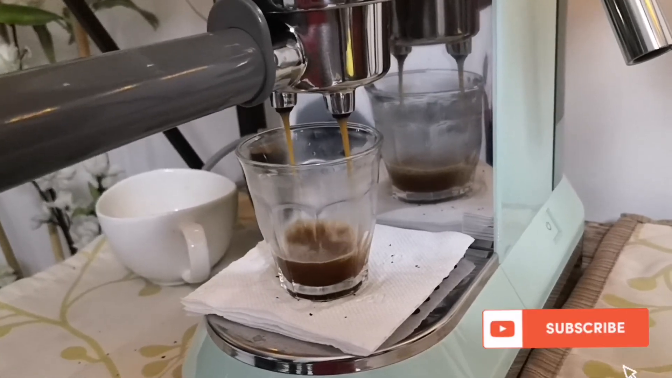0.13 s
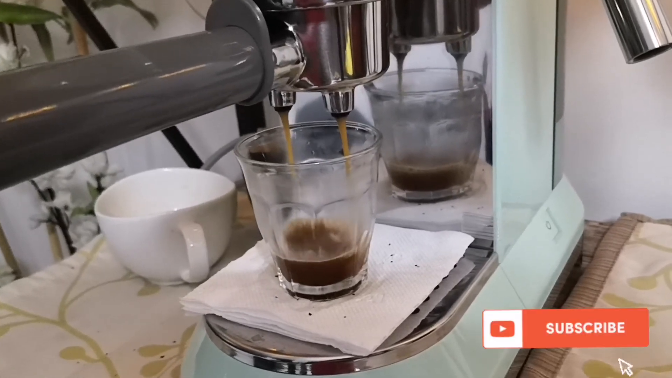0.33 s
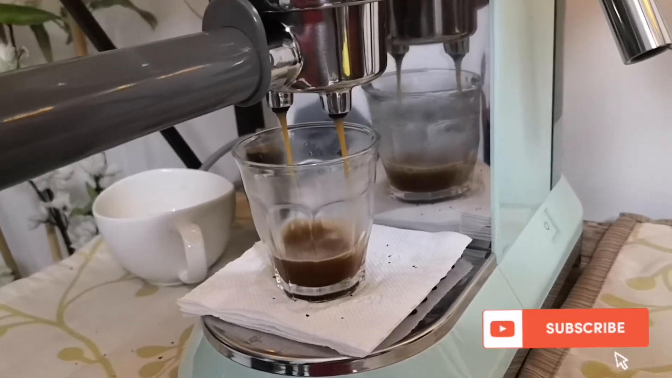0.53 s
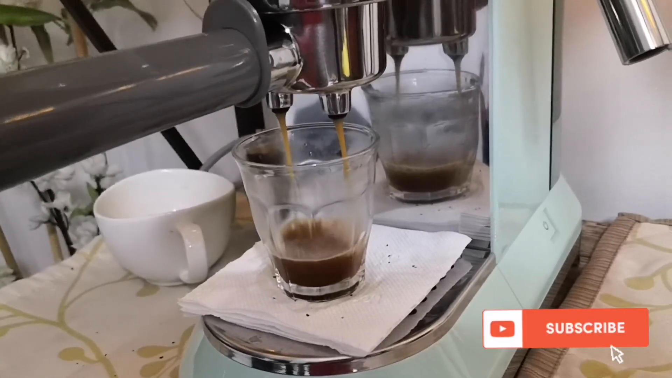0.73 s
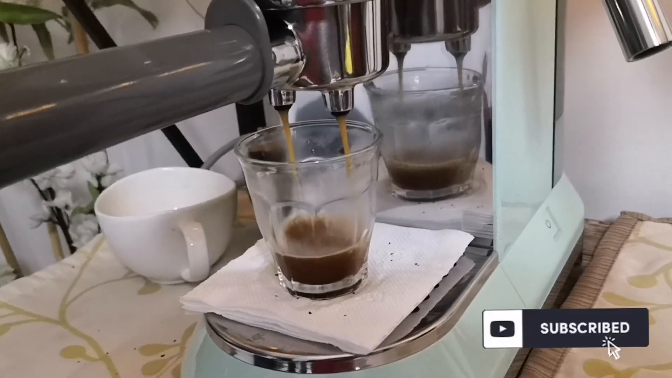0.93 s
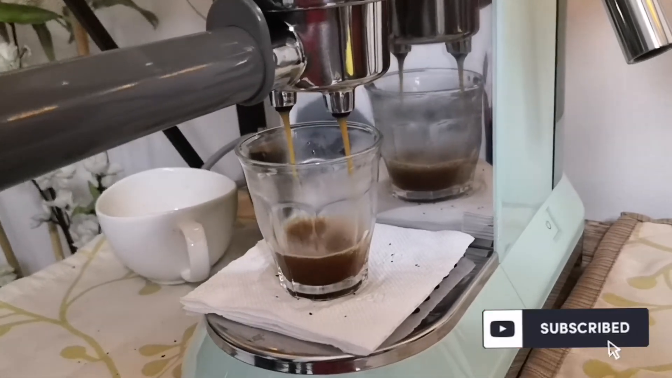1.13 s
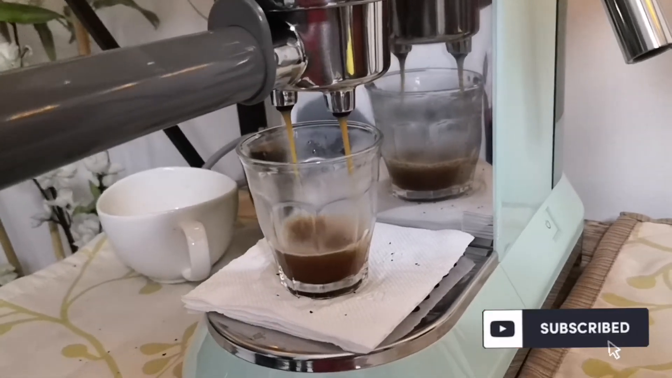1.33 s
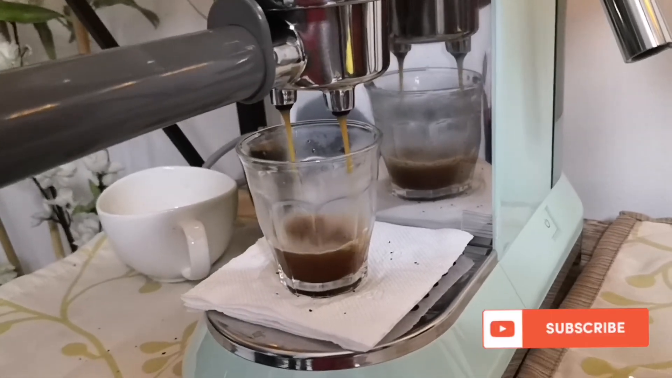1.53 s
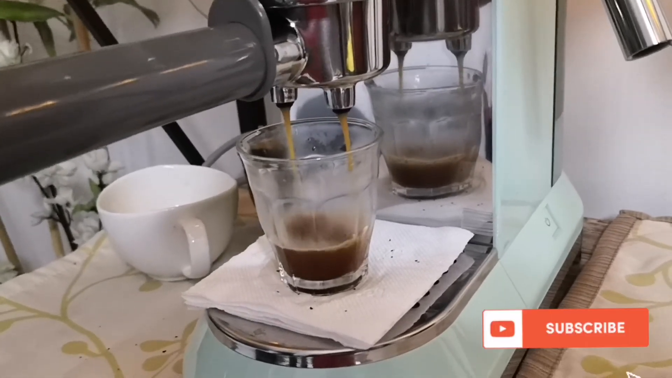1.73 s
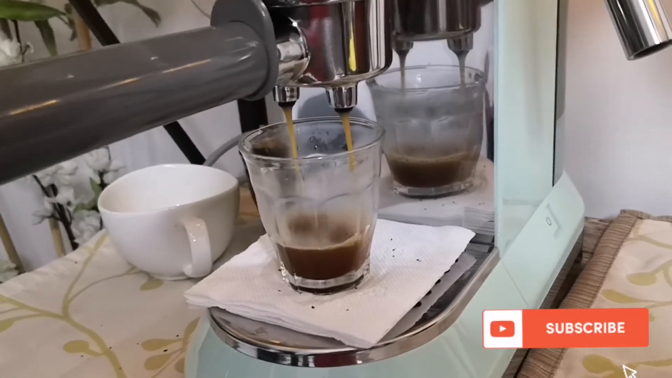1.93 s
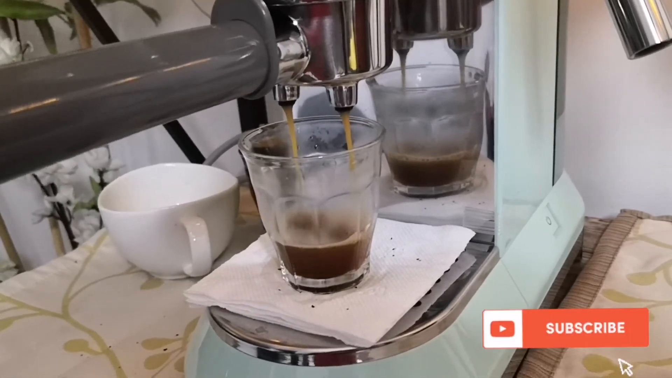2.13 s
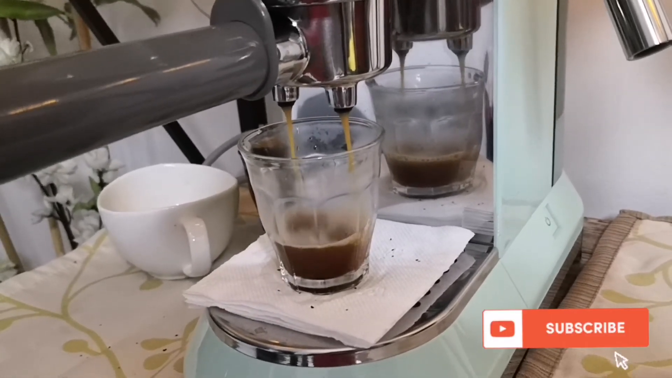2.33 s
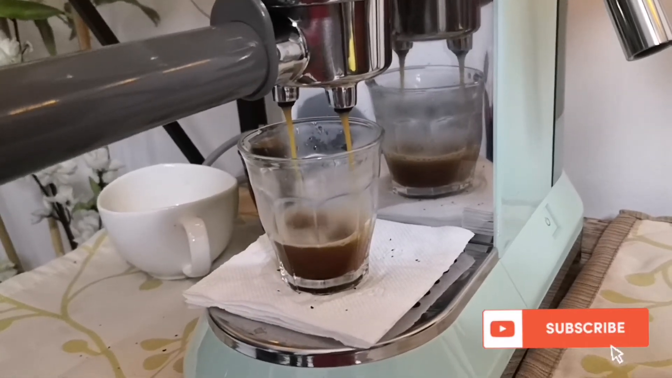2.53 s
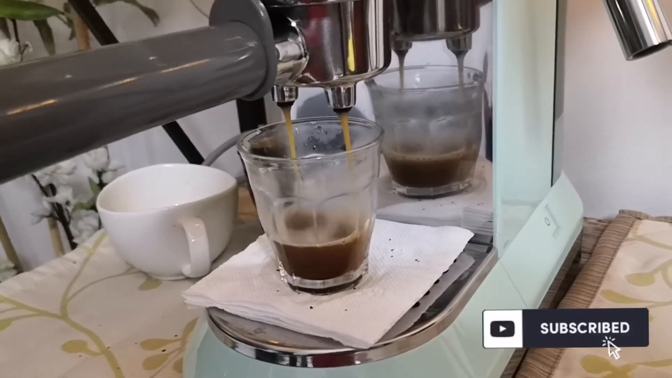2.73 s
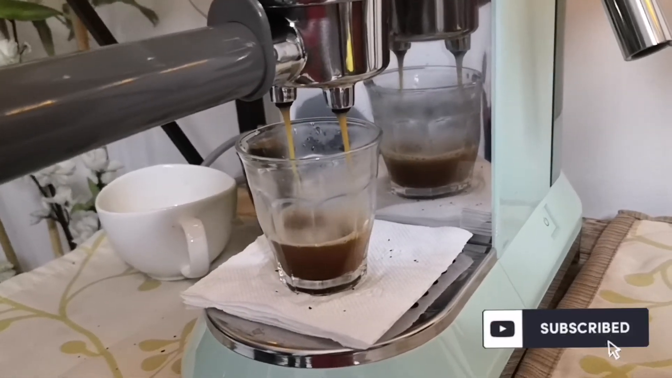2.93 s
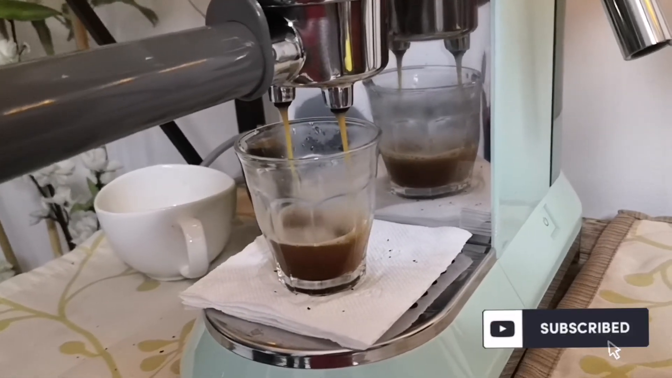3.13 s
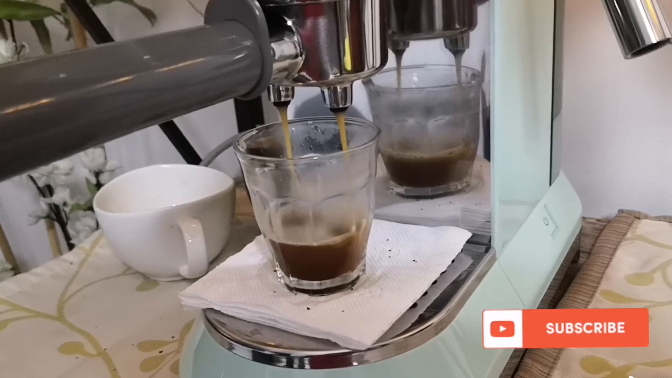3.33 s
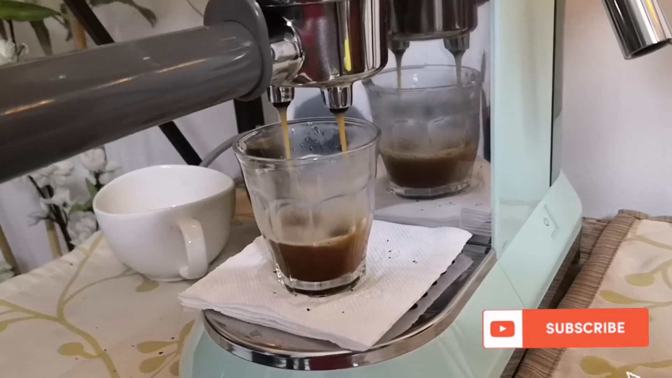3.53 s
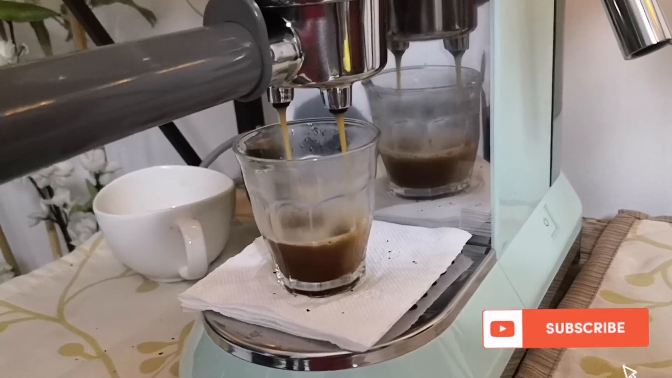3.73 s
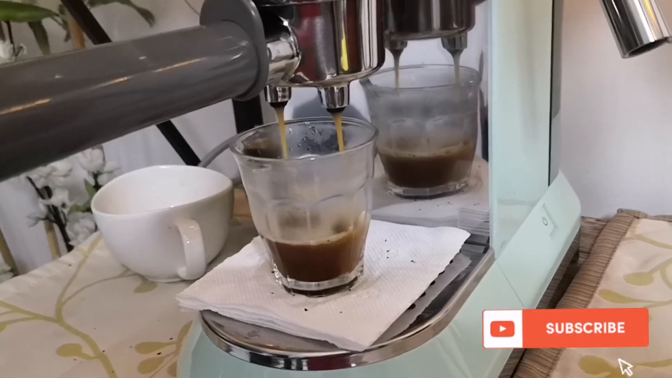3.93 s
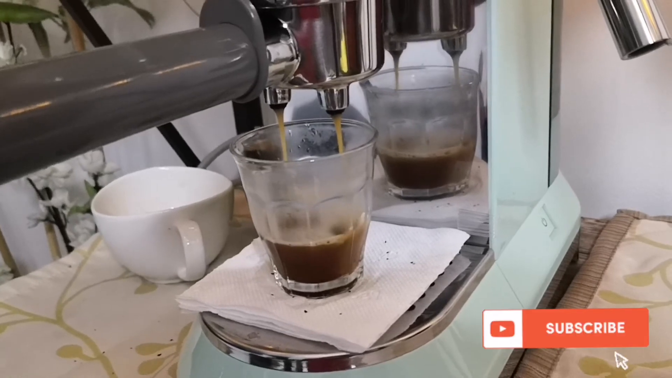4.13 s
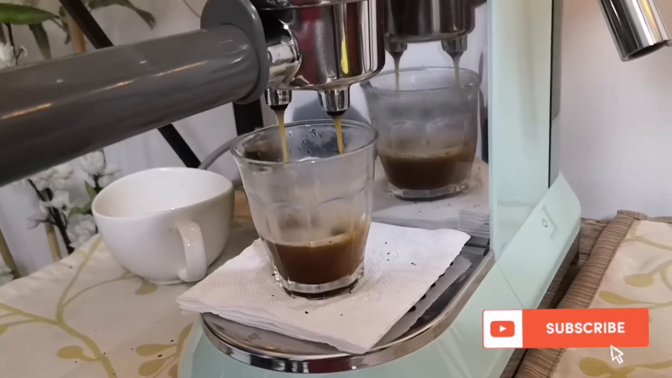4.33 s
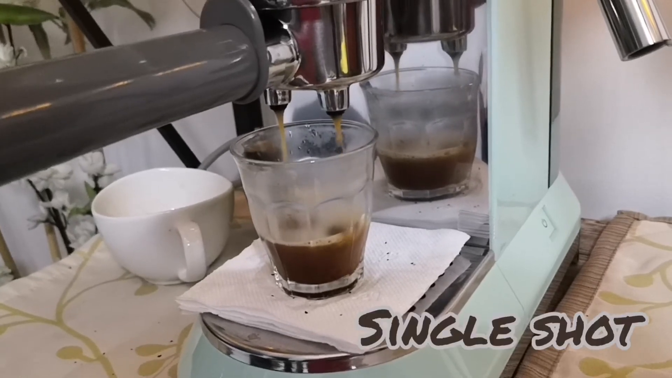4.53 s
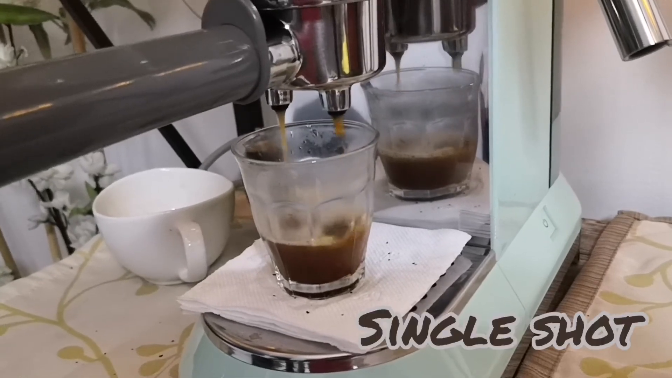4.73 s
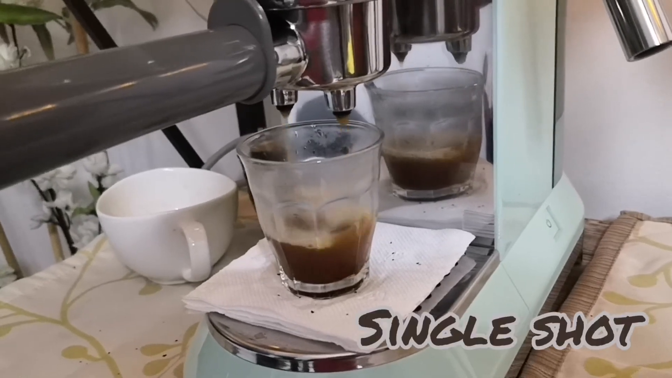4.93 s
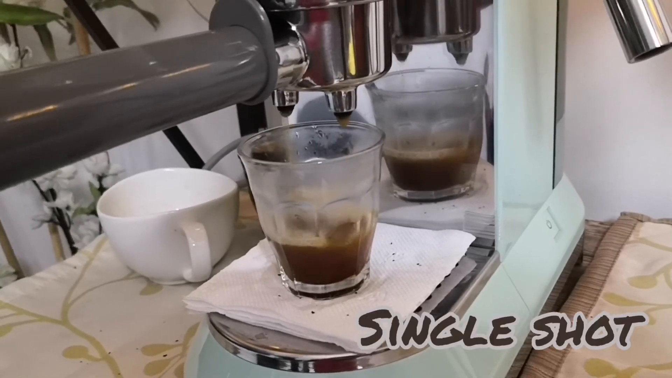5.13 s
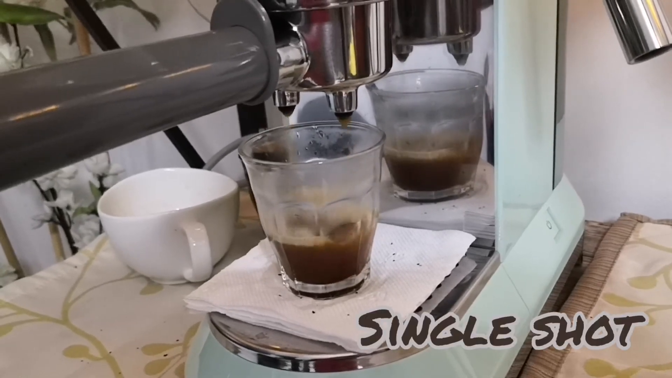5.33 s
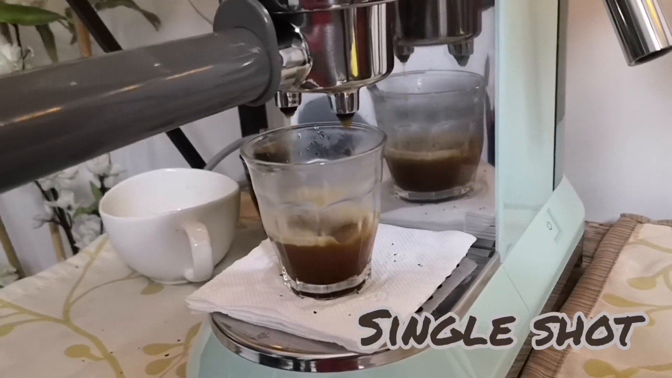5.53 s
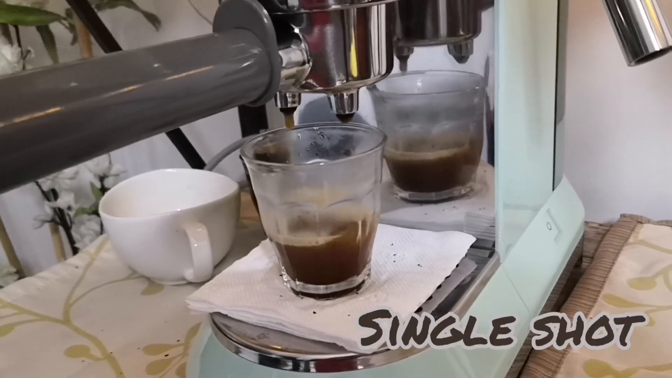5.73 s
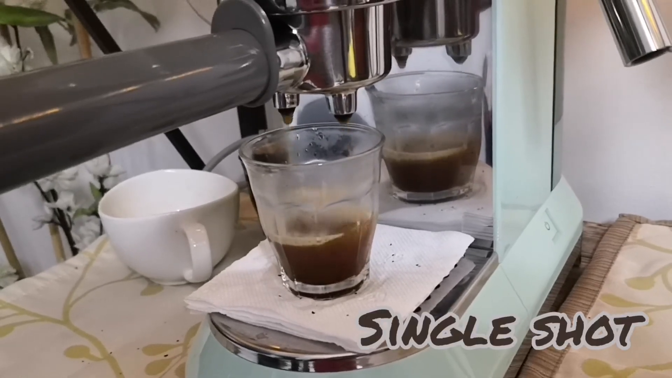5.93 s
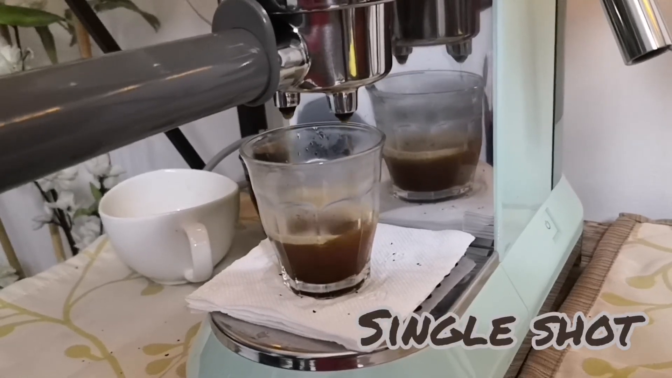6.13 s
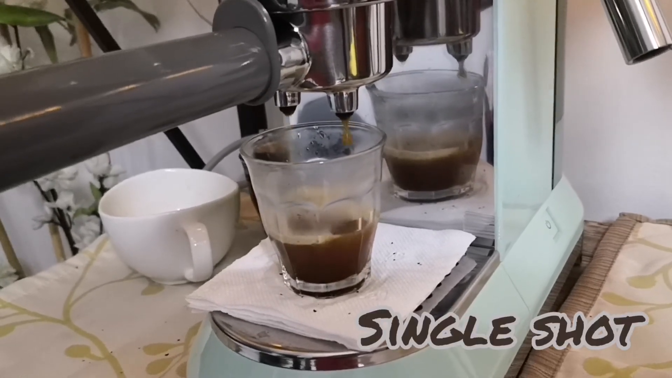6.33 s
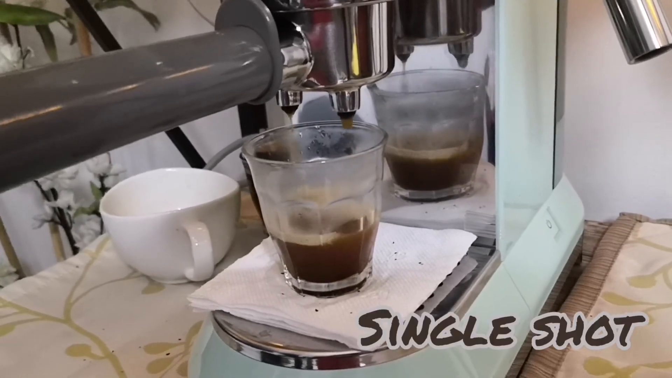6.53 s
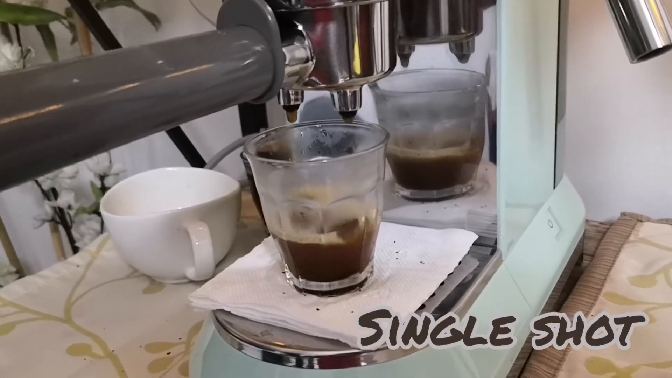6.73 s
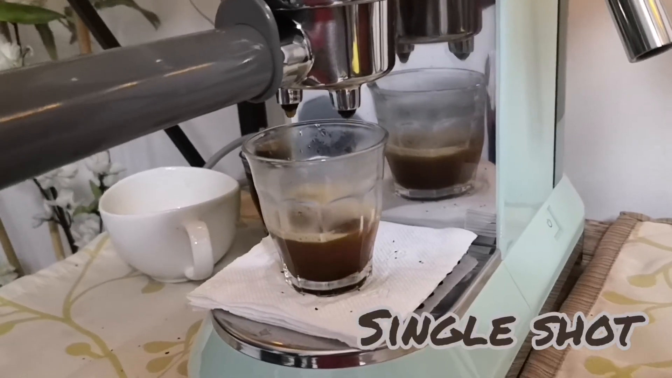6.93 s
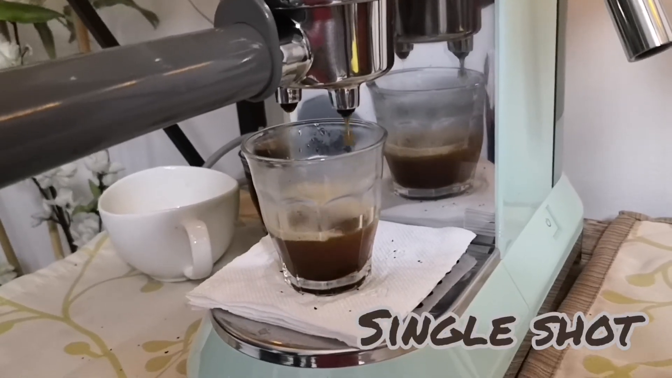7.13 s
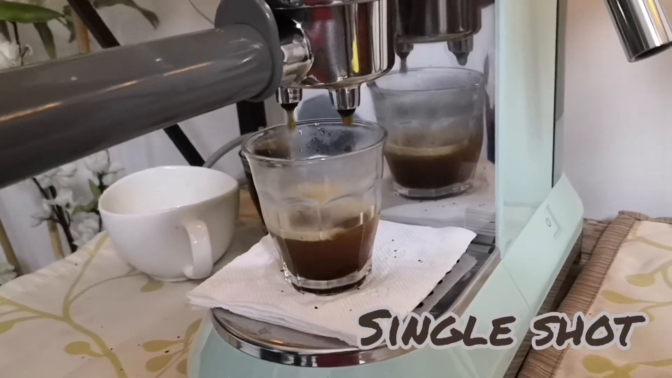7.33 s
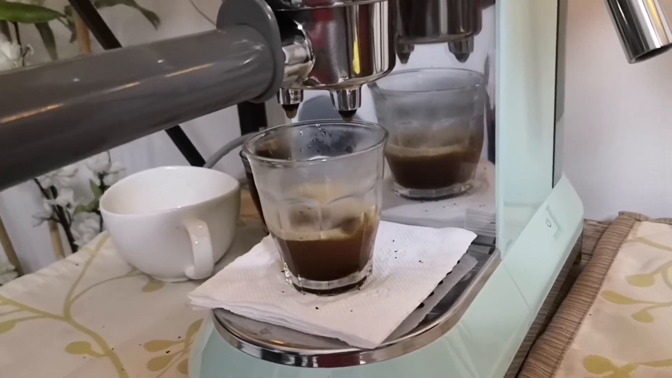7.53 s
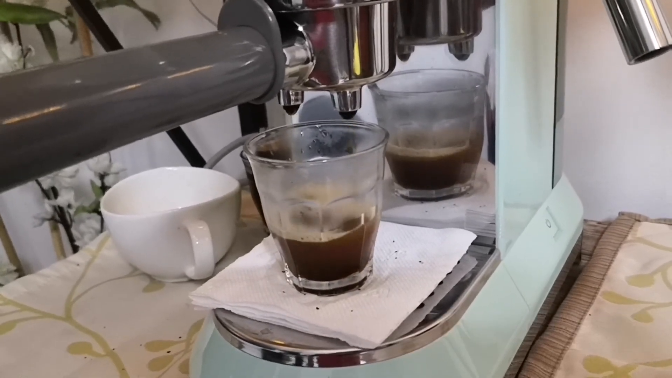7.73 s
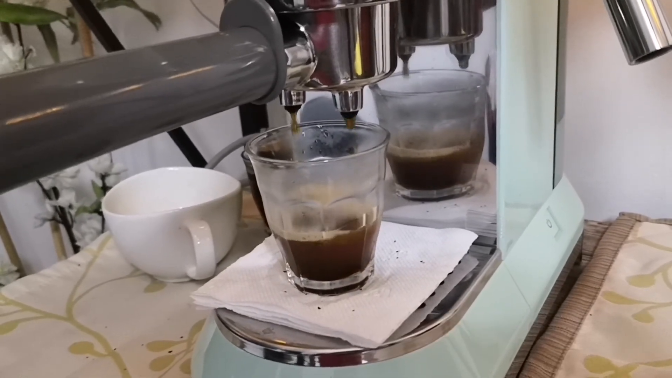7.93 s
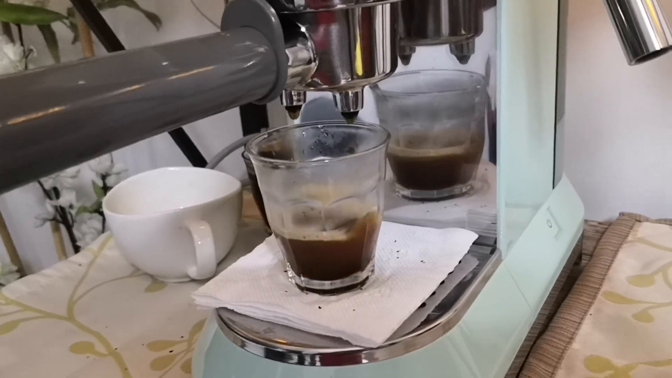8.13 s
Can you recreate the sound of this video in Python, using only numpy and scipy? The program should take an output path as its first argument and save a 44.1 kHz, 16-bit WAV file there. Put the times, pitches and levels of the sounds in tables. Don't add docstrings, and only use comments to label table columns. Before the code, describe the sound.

Close to a small espresso machine in a quiet kitchen, a vibrating pump hums low and buzzy with rushing water for about three seconds. Drops plink in a small glass and foam bubbles tick brightly. The pump cuts off abruptly; a very faint hiss bleeds away as drips grow sparse and end. Nearby cloth swishes and stiff wrapping crackles. Soft appliance hiss and distant traffic remain, in spaced stereo with a bright top.

```python
import sys
import numpy as np
from scipy import signal
from scipy.fft import rfft, irfft, next_fast_len
from scipy.io import wavfile
from scipy.ndimage import uniform_filter1d, map_coordinates

SR = 44100
rng = np.random.default_rng(int(sys.argv[2]) if len(sys.argv) > 2 else 0)


def transcribe(signal):
    frames = np.atleast_2d(signal).T
    limited = np.clip(frames, -1, 1)
    pcm = np.round(limited * 32767).astype(np.int16)
    wavfile.write(sys.argv[1], SR, pcm)


def nominal_scale(level):
    x = np.asarray(level, float) / 20
    return 10 ** x


N = 365148
CUT_S = 3.143


def unit(x):
    return x / np.sqrt(np.mean(x ** 2) + 1e-20)


def along(points, hz):
    f, v = np.transpose(points)
    return np.interp(np.log(hz + 1), np.log(f + 1), v)


def wobble(rate):
    return map_coordinates(rng.standard_normal(int(N * rate / SR) + 4), [np.arange(N) * rate / SR])


def filtered(x, response):
    n = x.shape[-1]
    m = next_fast_len(n + 4096)
    return irfft(rfft(x, m) * response(np.fft.rfftfreq(m, 1 / SR)), m)[..., :n]


def resonance(hz, width_hz):
    return lambda f: 1j * f * width_hz / (hz * hz - f * f + 1j * f * width_hz)


def stroke(s, attack, hold, t60):
    t = np.maximum(np.arange(N) / SR - s, 0)
    return (1 - np.exp(-(t / attack) ** 2)) * nominal_scale(-60 * np.maximum(t - hold, 0) / t60)


def add(track, s, sound):
    part = track[:, round(s * SR):][:, :sound.shape[-1]]
    part += sound[..., :part.shape[-1]]


# hz, correlation
ALIKE = [(60, .995), (130, .95), (290, .78), (450, .25), (640, -.25), (1400, .03), (3100, -.08),
         (6800, .02)]


def rush(gain, patchy_db):
    z = signal.stft(rng.standard_normal((2, N)), nperseg=512)[2]
    field = uniform_filter1d(uniform_filter1d(rng.standard_normal(z.shape[1:]), 6, 0), 10, 1)
    pair = signal.istft(z * nominal_scale(patchy_db * unit(field)), nperseg=512)[1][:, :N]

    def mid_side(hz):
        angle = np.arccos(np.clip(along(ALIKE, hz), -1, 1)) / 2
        return gain(hz) * [np.cos(angle), np.sin(angle)]

    mid, side = filtered(pair, mid_side)
    return unit(np.array([mid + side, mid - side]))


# hz, gain_db
PORT = [(6500, -1), (7600, 3.5), (8500, -2.5), (11000, -7.5), (12200, -27), (16000, -20)]


def port(hz):
    return nominal_scale(along(PORT, hz))


# hz, t60_s
WALLS = [(500, 0.21), (2000, 0.18), (8000, 0.096)]


def walls(x, wet_db):
    hz, t, z = signal.stft(rng.standard_normal((2, SR // 2)), SR, nperseg=256)
    tail = signal.istft(z * nominal_scale(-60 * t / along(WALLS, hz)[:, None]), SR, nperseg=256)[1]
    late = np.pad(x, ((0, 0), (150, 0)))
    wet = signal.fftconvolve(late, tail / np.linalg.norm(tail[0]), axes=1)
    return x + nominal_scale(wet_db) * wet[:, :N]


# hz, density_db
RUMBLE = [(12, -29), (20, -11), (80, -3), (97, -23), (118, -4.5), (203, -4.5), (308, -10), (362, -13),
          (500, -21.5), (650, -68), (1100, -120)]
# start_s, level_db, pitch_hz
THUDS = [
    (5.47, -43, 140),
    (7.22, -48, 204.7),
]


def traffic():
    t = np.arange(N) / SR
    recede_db = -2 * np.clip((t - 7.4) * 10, 0, 1)
    low = nominal_scale(-56.5 + recede_db + 0.99 * wobble(3.11)) * rush(lambda hz: nominal_scale(along(RUMBLE, hz)), patchy_db=1.2)
    t = t[:SR // 2]
    for s, db, hz in THUDS:
        decay = nominal_scale(db - 60 * t[None] / 0.51)
        add(low, s, decay * (1 - np.exp(-t / 0.034)) * np.sin(2 * np.pi * hz * t))
    return low


# pitch_hz, level_db
FRIDGE = [(155, -71), (960, -79), (1060, -81.5)]
# hz, density_db
KITCHEN = [(350, -91), (500, 1), (1000, 1), (2000, 0.5), (2700, -3), (3100, -10), (5000, -16.5),
           (6900, -18.5), (7600, -13.5), (8300, -26.5), (11000, -30.5), (15500, -29)]


def appliances():
    t = np.arange(N) / SR
    lines = np.zeros(N)
    for hz, db in FRIDGE:
        level = nominal_scale(db + 4.0 + 3.2 * wobble(3.97))
        lines += level * np.sin(2 * np.pi * hz * t + 1.17 * wobble(7.3))
    hiss = rush(lambda hz: nominal_scale(along(KITCHEN, hz)), patchy_db=1.13)
    return lines + nominal_scale(-59 + 0.057 * wobble(1.65)) * hiss


# start_s, hold_s, level_db, dull_db, bright_db
SWISHES = [(4.105, 0.046, -62.5, -0.5, -15), (4.263, 0.063, -65, 1, -14), (4.392, .04, -68, -9, -17),
           (4.56, 0.093, -73, 6.5, -16), (4.68, 0.025, -62, -4, -12), (4.728, 0.02, -56, -6, -24),
           (4.87, 0.011, -53.5, 2, -15), (5.21, 0.069, -78, 17, -28), (5.696, 0.036, -65.5, 3, -20),
           (4.96, 0.024, -64, -1, -17), (5.039, 0.085, -66.5, -9, -6), (5.25, 0.075, -50, -4, -10.5),
           (5.44, 0.075, -64, 4, -27), (5.525, 0.13, -52, -4, -10.5), (5.782, .025, -58, -22, -8),
           (5.846, 0.12, -54, -7, -8.5), (6.359, 0.078, -53, -12, -7.5), (6.518, 0.028, -58, -4, -25),
           (7.5, 0.17, -67.5, -3, -21), (7.584, 0.014, -53.5, -4, -18), (8.128, 0.094, -67.5, -4, -15)]
# hz, density_db
CLOTH = [(2500, -5.5), (3500, -12), (5000, -1.5), (6800, -3.5), (7600, 5.5), (8300, -5), (9500, -11),
         (11500, -74)]
# hz, density_db
SHEEN = [(7500, -30), (9000, 0), (10000, 0), (11500, -5), (12400, -9), (14600, -9), (15200, -12),
         (15400, -30)]


def cloth():
    attack_s, t60_s, settle_db, settle_t60_s = 0.021, 0.44, -34, 1.2
    envelopes = np.zeros((3, N))
    for s, hold, db, dull_db, bright_db in SWISHES:
        shape = stroke(s, attack_s, hold, t60_s) + nominal_scale(settle_db) * stroke(s, attack_s, hold, settle_t60_s)
        envelopes += nominal_scale(db + np.array([[0], [dull_db], [bright_db]])) * shape
    plain, dull, bright = envelopes
    shift = round(.005 * SR)
    swish = plain * rush(lambda hz: nominal_scale(along(CLOTH, hz)), patchy_db=.8) * nominal_scale([[2.2], [-2.2]])
    dull_noise = rush(lambda hz: np.abs(resonance(2600, 2200)(hz)) ** 2, patchy_db=3.0)
    swish += nominal_scale(1.0) * np.roll(dull, -shift) * dull_noise
    swish += np.roll(bright, shift) * rush(lambda hz: nominal_scale(along(SHEEN, hz)), patchy_db=-2.0)
    tiny = (rng.uniform(size=N) < 400 / SR) * rng.standard_normal((2, N)) * nominal_scale(15)
    crackle = filtered(tiny, lambda f: resonance(5500, 6000)(f) * port(f))
    return nominal_scale(1.8 * wobble(90)) * swish + plain * crackle


# start_s, level_db, pitch_hz, hold_s
CRINKLES = [(0.073, -57, 6300, 0.033), (0.641, -51, 7300, 0.017), (0.954, -50, 6540, 0.027),
            (1.226, -62.5, 7300, 0.12), (1.395, -51.5, 5030, 0.016), (1.813, -53.5, 7640, 0.019),
            (3.1, -50, 4900, 0.014), (3.101, -58, 7550, 0.021), (3.626, -64, 7160, 0.0067),
            (3.766, -65, 5500, 0.03), (3.923, -53.5, 4000, 0.0066), (4.108, -58.5, 9600, 0.023),
            (4.89, -54, 7500, 0.0055), (4.934, -48, 5400, 0.011), (5.708, -49, 8200, 0.009),
            (6.339, -61, 6960, 0.0085), (6.524, -48, 8350, 0.018), (7.124, -67.5, 6200, 0.023),
            (7.215, -66, 6000, 0.015), (7.456, -59, 6750, 0.018), (7.605, -42.5, 7500, 0.0036),
            (7.831, -66.5, 6460, 0.017), (8.119, -59, 7040, 0.0062)]
# start_s, level_db, pitch_hz, width_hz, hold_s
SQUEAKS = [(0.96, -55, 5770, 600, 0.092), (1.817, -54.5, 5640, 400, 0.051), (3.289, -63.5, 7300, 800, .12),
           (3.336, -59.5, 3670, 420, 0.11), (3.624, -51.5, 4700, 700, 0.013),
           (3.623, -60, 7300, 700, 0.011), (4.1, -68, 7400, 900, 0.16), (4.882, -50, 6500, 500, .008),
           (4.883, -50, 9150, 700, .004), (5.251, -56, 2240, 400, 0.1), (5.513, -56.5, 6800, 1200, .03),
           (3.133, -58.5, 5000, 700, 0.025), (5.257, -56, 3580, 2200, 0.054), (5.35, -66, 2600, 500, .04),
           (5.646, -49.5, 3020, 900, 0.01), (7.57, -54, 5070, 280, 0.059), (7.601, -55, 3500, 900, 0.033),
           (5.792, -70, 5300, 700, .015), (3.926, -59.5, 2600, 500, 0.032), (8.118, -61, 5070, 600, .01),
           (8.174, -59.5, 5600, 800, .008), (8.177, -64, 3770, 500, 0.022)]
# start_s, peak_db, pitch_hz
SNAPS = [(4.7027, -48, 5420), (4.7451, -43, 7140), (4.7731, -48, 7860), (4.8863, -36, 8810),
         (4.8904, -38, 8880), (4.9412, -42, 5940), (5.2593, -44, 3640), (5.2749, -38, 3690),
         (5.4645, -49, 6060), (5.5164, -48, 7340), (5.655, -39, 3170), (5.7099, -37, 7680),
         (5.8014, -43, 7430), (5.8571, -40, 7730), (5.9938, -40, 7530), (6.3465, -54, 7640),
         (6.3874, -40, 7470), (6.4208, -38, 7730), (6.5326, -37, 7660), (7.4664, -50, 7150),
         (8.1209, -54, 5570)]


def wrapping():
    sound, t = np.zeros((2, N)), np.arange(SR // 3) / SR
    creaks = [(s, db, hz, 0.6 * hz, hold, 17.4 * hold) for s, db, hz, hold in CRINKLES]
    creaks += [(*row, 0.21) for row in SQUEAKS]
    for s, db, hz, width_hz, hold, t60 in creaks:
        colour = lambda f: resonance(hz, width_hz)(f) * resonance(hz, 1.6 * width_hz)(f) * port(f)
        grain = unit(filtered(rng.standard_normal((2, len(t))), colour))
        shape = nominal_scale(db - 60 * np.maximum(t - hold, 0) / t60) * (1 - np.exp(-t / .003))
        add(sound, s, nominal_scale([[1.5], [-1.5]]) * shape * grain)
    for s, db, hz in SNAPS:
        colour = lambda f: resonance(hz, 2500)(f) ** 2 * port(f)
        crack = unit(filtered(rng.standard_normal((2, 900)), colour))
        add(sound, s, nominal_scale(db - 7 - 60 * t[:900] / .015) * crack)
    return sound


# start_s, length_s, pitch_hz, level_db
WHISTLE = (.898, .047, 3140, -52)


def seal():
    sound, t = np.zeros((2, N)), np.arange(SR // 3) / SR
    s, length, hz, db = WHISTLE
    shape = nominal_scale(db - 60 * np.maximum(t - length, 0) / .03) * (1 - np.exp(-t / .004))
    add(sound, s, shape * np.sin(2 * np.pi * hz * t + .8 * wobble(60)[:len(t)])[None])
    return sound


# pitch_hz, width_hz, level_db
VENT = [(2600, 610, -67), (4900, 3200, -68), (9500, 4400, -73.5)]


def vent():
    def colour(f):
        power = sum((nominal_scale(db) * np.abs(resonance(hz, w)(f)) ** 2) ** 2 / w for hz, w, db in VENT)
        return np.sqrt(power) * port(f)

    return nominal_scale(-67.5) * stroke(CUT_S, 0.087, 0.84, 1.4) * rush(colour, patchy_db=-0.5)


# start_s, peak_db, pitch_hz
POPS = [(0.066, -41.5, 5100), (0.1032, -36, 5960), (0.1391, -40, 6000), (0.19, -42, 5700),
        (0.2215, -36.5, 6000), (0.238, -32, 5730), (0.625, -40, 5900), (0.64, -38, 7500),
        (0.9637, -37, 6930), (1.228, -40, 7100), (1.821, -39, 5670), (2.082, -35.5, 4700),
        (2.1326, -29.5, 5600), (2.499, -42, 5900), (2.618, -44, 5900), (2.7825, -33, 6200),
        (2.9025, -39.5, 7760), (2.948, -41, 4700), (3.066, -37, 4800), (3.143, -42, 5230),
        (3.289, -43.5, 6400), (3.6274, -50, 4500), (3.7214, -47, 6170), (3.772, -47.5, 7450),
        (3.86, -37.5, 6170), (3.913, -46, 7800), (3.9903, -53, 6000), (4.0517, -55, 5310),
        (4.116, -56, 7560), (4.235, -46, 7040), (0.214, -41, 5900), (0.608, -48, 6090), (0.731, -46, 6900),
        (0.8969, -46, 5900), (1.047, -44, 7440), (1.1648, -47, 7110), (1.6043, -47, 6100),
        (1.6147, -48, 7570), (2.347, -42, 6850), (2.5656, -52, 5610), (3.383, -50, 5460),
        (3.496, -53, 7400), (3.549, -59, 4800), (3.594, -56, 6300), (3.66, -57.5, 6450), (4.003, -53, 6100),
        (0.11, -41, 2800), (0.581, -43, 2800), (1.1, -39, 3450), (0.9155, -36.5, 6460),
            (1.0176, -36, 5800), (1.119, -40.5, 3530), (1.276, -39, 2800), (1.992, -47, 3200),
            (2.0574, -36.5, 3450), (2.584, -34.5, 3500), (2.001, -48, 3400), (2.0303, -51, 3200),
            (2.1331, -35, 3490), (2.1934, -45, 3700), (2.4354, -43, 3400), (2.6609, -41.5, 3460),
            (1.3404, -42, 3200), (2.2757, -48, 2900), (3.853, -40, 2600), (3.859, -38.5, 4000),
            (3.934, -47, 2600), (3.916, -43, 2550), (4.283, -50, 2916), (3.4436, -45, 2690),
            (3.4366, -41, 3500), (4.2808, -49.5, 3500)]
# pitch_hz, width_hz, gain_db
GLASS = [(3500, 320, 0.5), (4970, 400, 3), (6000, 800, 0), (7300, 290, 2.5)]


def foam():
    pings, blows, t = np.zeros((2, N)), np.zeros((2, N)), np.arange(600) / SR
    for s, db, hz in POPS:
        phase, spread = rng.uniform(size=(2, 1))
        gain = nominal_scale(db + np.array([[1.2], [-1.2]]))
        cycles = hz * t + phase + .36 * spread * [[0], [1]]
        shape = nominal_scale(-60 * t / 0.011) * (1 - np.exp(-t / 0.000088))
        add(pings, s, gain * shape * np.sin(2 * np.pi * cycles))
        add(blows, s, 1.51 * gain * nominal_scale(-60 * t / 0.014) * rng.standard_normal((2, len(t))))
    for s, db, _ in DRIPS + LAST_DRIPS:
        crack_db = db - 7.5 - 3.4 * max(s - CUT_S, 0)
        add(blows, s, nominal_scale(crack_db - 60 * t / 0.022) * rng.standard_normal((2, len(t))))
    tiny = (rng.uniform(size=N) < 45 / SR) * nominal_scale(-41 + 3 * rng.standard_normal(N))
    tiny *= np.arange(N) < CUT_S * SR
    blows += np.array([tiny, np.roll(tiny, 13)])

    def modes(f):
        return 0.19 + sum((-1) ** k * nominal_scale(db) * resonance(hz, w)(f) for k, (hz, w, db) in enumerate(GLASS))

    bursts = pings + filtered(blows, modes)
    return filtered(bursts, lambda f: resonance(4500, 9000)(f) * nominal_scale(0.48 * along(PORT, f)))


# start_s, peak_db, air_column_hz
DRIPS = [(0.104, -43, 1150), (0.221, -45, 1060), (0.6717, -31, 1910), (0.673, -39, 965), (0.908, -44, 1400),
         (2.1, -44, 835), (2.591, -39, 885), (3.07, -45.5, 890), (1.119, -41, 1920), (1.828, -46, 1800),
         (1.851, -43.5, 1800), (1.992, -28.5, 1890), (2.0296, -47, 1790), (2.0824, -36, 1940),
         (2.105, -37, 1960), (2.1338, -38.5, 1960), (2.1942, -29.5, 1940), (2.231, -42, 1820),
         (2.308, -35.5, 1900), (2.581, -31, 1820), (2.584, -32, 1850), (2.608, -38, 2100),
         (2.622, -40, 1820), (2.6598, -38.5, 1840), (2.782, -40, 1890), (2.795, -34, 1800),
         (2.9127, -30.5, 1815), (2.9478, -29, 1820), (2.981, -42, 1800), (2.999, -43.5, 1770),
         (3.0073, -31, 1830), (3.0194, -32.5, 1720), (3.038, -42, 1800), (3.048, -44, 1830),
         (3.067, -30.5, 1760), (3.082, -40, 1800), (3.087, -35, 1810), (3.0905, -39.5, 1780),
         (3.099, -43, 1810), (3.1103, -36, 1890), (3.12, -36, 1800), (3.1456, -32.5, 1840),
         (3.166, -51, 1820), (3.178, -54, 1780)]
# start_s, peak_db, air_column_hz
LAST_DRIPS = [(3.289, -45, 1830), (3.295, -48, 1770), (3.327, -40, 1780), (3.358, -38, 1880),
              (3.4092, -35, 1880), (3.4374, -33.5, 1760), (3.4434, -30, 1790), (3.476, -46.5, 1810),
              (3.489, -46.5, 1780), (3.503, -45, 1820), (3.549, -47, 1770), (3.564, -36.5, 1910),
              (3.609, -38, 1740), (3.655, -46, 1730), (3.723, -37, 1800), (3.7718, -41.5, 1770),
              (3.793, -41, 1810), (3.804, -42, 1830), (3.8526, -37.5, 1775), (3.859, -37, 1790),
              (3.913, -44, 1750), (3.934, -39, 1750), (3.971, -59, 1780), (4.0025, -60, 1880),
              (4.0462, -59, 1780), (4.1, -49, 1740), (4.1417, -39, 1860), (4.235, -45, 1840),
              (4.2834, -38.5, 1850), (4.323, -44.5, 1840), (4.3448, -48, 1810), (4.3704, -43, 1860),
              (4.3903, -53, 1950), (4.4182, -62, 1800), (4.478, -35.5, 1870), (4.6192, -39, 1920),
              (4.677, -45, 1910), (4.689, -47, 1880)]


def drips():
    glass, splash, t = np.zeros((1, N)), np.zeros(N), np.arange(2600) / SR
    landed = DRIPS + LAST_DRIPS
    droplets = [(s - .015, db - 16.5, hz * 0.96) for s, db, hz in LAST_DRIPS if -44 < db < -34.5]
    rebounds = [(s + .0118, db - 11.5, hz) for s, db, hz in landed if db > -44]
    for s, db, hz in landed + droplets + rebounds:
        t60, beat, soft, glide = rng.uniform(size=4)
        ring = np.sin(2 * np.pi * hz * t * (1 + 7 * (glide - .3) * (t - .004)))
        ring += 0.12 * np.sin(2 * np.pi * (hz * 1.296 * t + beat))
        ring += 0.11 * np.sin(2 * np.pi * hz * 0.475 * t)
        onset = 1 - np.exp(-(t / (0.001 + 0.0012 * soft)) ** 2)
        add(glass, s - .0008, nominal_scale(db + 9.0 - 60 * t / (0.012 + 0.011 * t60)) * onset * ring)
    for s, db, _ in landed:
        splash[round(s * SR)] = nominal_scale(-66 + 0.26 * (db + 33.0))
    splash = signal.lfilter([1], [1, -nominal_scale(-60 / 0.46 / SR)], splash)
    hits = (rng.uniform(size=N) < 300 / SR) * rng.standard_normal(N)
    hits *= nominal_scale(2.5 * np.minimum(rng.exponential(size=N), 2))
    glass[0] += splash * unit(filtered(hits, lambda f: resonance(1800, 220)(f) * resonance(1860, 500)(f)))
    return np.array([nominal_scale(-7.0) * glass[0], nominal_scale(2.5) * np.roll(glass[0], 29)])


# time_s, level_db
PUMP = [
    (0, 0),
    (1.7, -1),
    (3.0, 0.5),
    (3.6, 3.5),
]


def effort_db():
    t = np.arange(N) / SR
    after = np.maximum(t - CUT_S, 0)
    s, db = np.transpose(PUMP)
    push = np.interp(t, s, db, left=-200, right=-200)
    return push - np.minimum(300 * after, 24) - 900 * np.maximum(after - .075, 0)


# hz, density_db
WATER = [(15, -30), (60, -7), (97, -6), (120, 4), (172, 5), (231, 2), (427, -8.5), (480, -12), (900, -8.5),
         (2400, -7), (3300, -15.5), (7700, -16), (8700, -27), (10600, -31), (12000, -40), (15500, -42)]


def water(cycle):
    throb = .85 + .36 * np.exp(-((cycle + .03) % 1) / .3) * nominal_scale(2 * wobble(60))
    flow = rush(lambda hz: nominal_scale(along(WATER, hz)), patchy_db=2.0)
    flow = nominal_scale(-51 + 3.0 + 0.17 * wobble(4.23)) * throb * flow
    gate = np.exp(-(((cycle - 0.082 + .5) % 1 - .5) / 0.1) ** 2)
    jet = rush(lambda hz: np.abs(resonance(6600, 3500)(hz)) ** 2, patchy_db=0.0)
    return flow + nominal_scale(-70 + 3.1 * wobble(60)) * unit(gate) * jet


# multiple, level_db (rms), left_right_db
STROKES = [(1, -53, 0), (2, -48, 0), (3, -57, 5), (4, -47, -1), (5, -46, 0), (6, -52, 0), (7, -55, 2),
           (8, -76, 0), (9, -75, 0), (19, -75, -2), (22, -74, -14), (27, -77, -14), (28, -76, 2),
           (31, -74, 3), (33, -74, 8), (35, -76, -14), (36, -77, 1), (37, -74, 4), (38, -74, -6),
           (42, -78, -2), (43, -79, 12), (45, -78, -9), (10, -69, 4), (11, -66, 8), (12, -66, 4),
           (13, -67, -4), (14, -64, -15), (15, -62, 2), (16, -64, 9), (17, -68, 1), (18, -71, -7),
           (20, -68, 1), (21, -70, 17), (23, -65, 3), (24, -69, -4), (25, -67, -6), (26, -63, 3),
           (29, -70, 9), (30, -71, -11), (32, -69, 13), (34, -70, -2), (39, -65, 1), (40, -65, 4),
           (41, -70, 2), (44, -68, -2)]
# hz, lead_rad
LEAD = [(60, 0), (180, 0), (300, .5), (420, 1.3), (600, .9), (720, -.3), (900, .6), (1400, -.2),
        (2400, -.5)]
SMEAR = [-.2545, -1.07, 2.712, 13.026]
# hz, phase_rad
HOUSING_LAG = [(600, 0), (720, -.7), (1300, -.2), (1380, -2.6), (1450, -1.1), (1600, -.9), (1750, .4),
               (2400, 1.3), (2650, .5)]
# hz, ripple_rad
ECHO_RIPPLE = [(1700, 1.3), (1900, 0)]


def pump():
    mains_hz, knock_at, echo_after = 60.065, .25, 1 / 3
    effort = nominal_scale(effort_db())
    turn = 2 * np.pi * mains_hz * np.arange(N) / SR + 0.0034 * wobble(14)
    sides = np.array([[.5], [-.5]])
    hum = np.zeros((2, N))
    for multiple, db, pan_db in STROKES:
        hz = multiple * mains_hz
        if multiple < 8:
            start = np.polyval(SMEAR, multiple - 4)
        else:
            start = np.pi / 2 - 2 * np.pi * knock_at * multiple + along(HOUSING_LAG, hz)
            start += along(ECHO_RIPPLE, hz) * np.cos(2 * np.pi * echo_after * (multiple - 1))
        start = start + multiple * 0.0035 * wobble(9.1) + sides * along(LEAD, hz)
        ring = .95 * np.abs(resonance(245, 70)(hz))
        fade = effort ** np.clip(1.24 + 0.022 * multiple - ring, 1 / 4, 3 / 2)
        split = nominal_scale(sides * pan_db)
        split = split / np.sqrt(np.mean(split ** 2))
        hum += nominal_scale(db + 3.5 + 0.99 * wobble(7.11)) * split * fade * np.sin(multiple * turn + start)
    return hum + effort * nominal_scale([[.7], [-.7]]) * water(turn / (2 * np.pi))


def scene():
    background = traffic() + appliances()
    near = cloth() + wrapping() + seal() + vent()
    cup = walls(foam(), wet_db=-10) + walls(drips(), wet_db=-9)
    return background + near + cup + pump()


def band_limit(x):
    return signal.sosfilt(signal.butter(12, 16150, fs=SR, output="sos"), x)


# hz, left_right_db
TILT = [(600, 0), (1400, 0.3), (2800, -1.6), (4500, -3), (7400, 5), (9500, -6), (14000, -0.5)]


def record(dry):
    sides = np.array([[.5], [-.5]])
    mix = filtered(dry, lambda hz: (hz < 15720) * nominal_scale(sides * along(TILT, hz)))
    return band_limit(mix)


dry = scene()
out = record(dry)
transcribe(out)
```